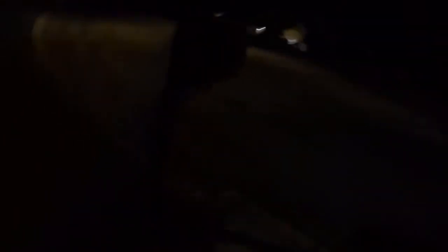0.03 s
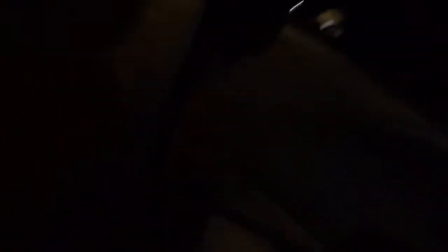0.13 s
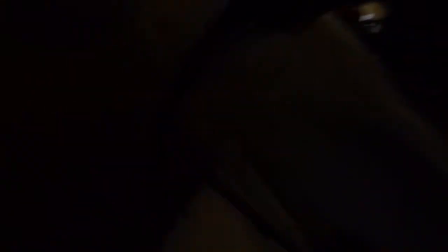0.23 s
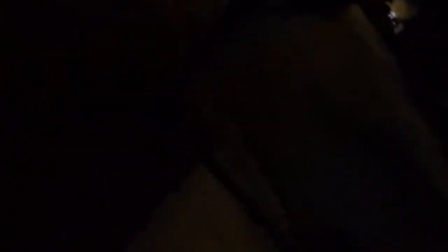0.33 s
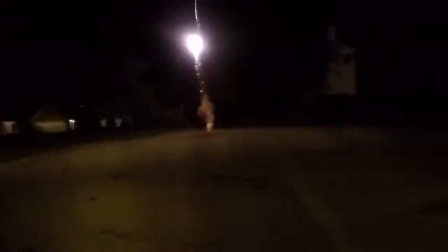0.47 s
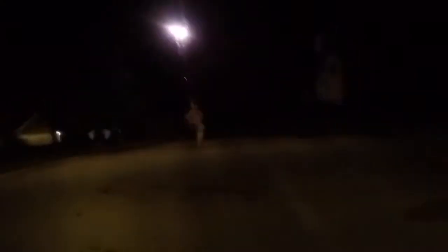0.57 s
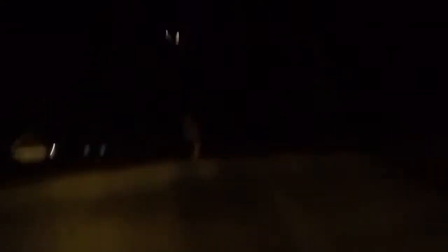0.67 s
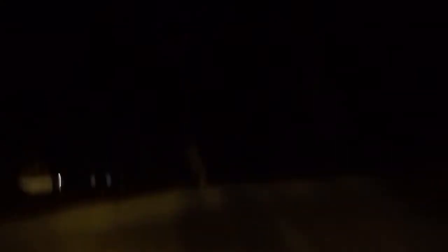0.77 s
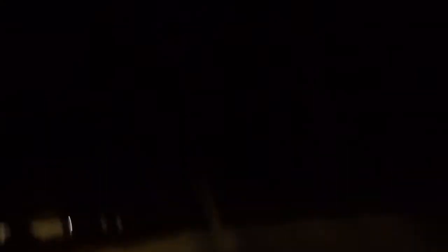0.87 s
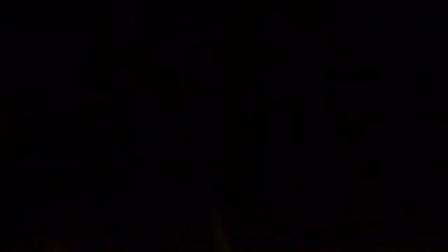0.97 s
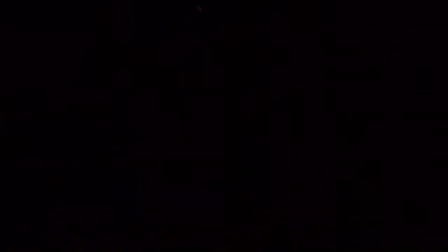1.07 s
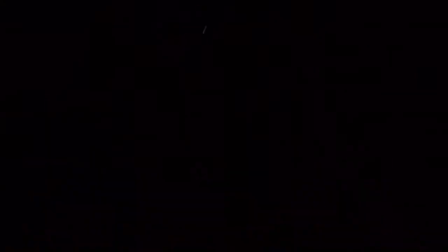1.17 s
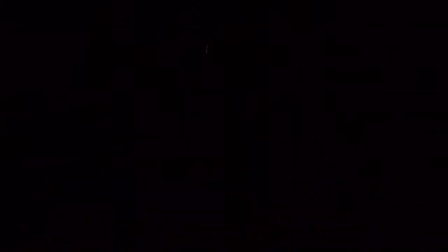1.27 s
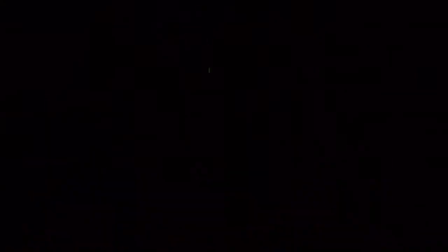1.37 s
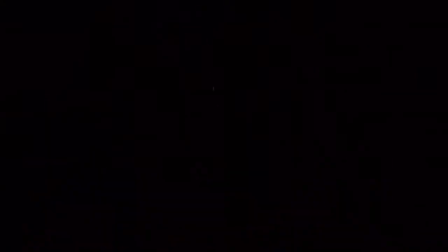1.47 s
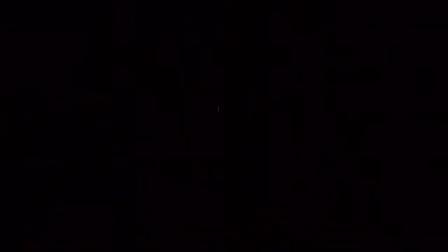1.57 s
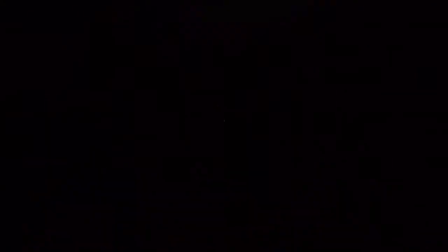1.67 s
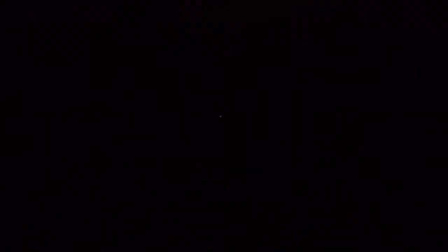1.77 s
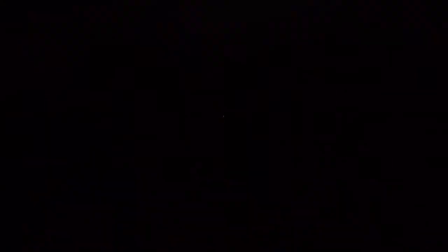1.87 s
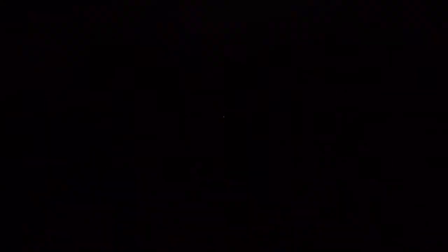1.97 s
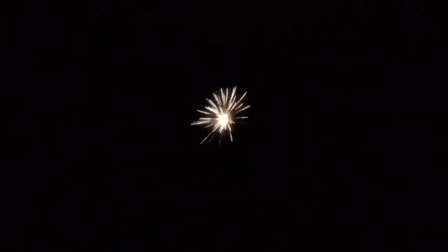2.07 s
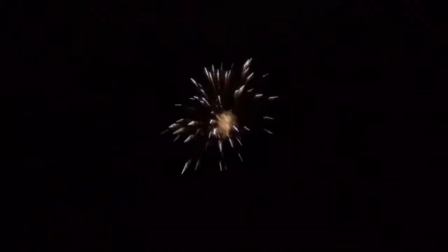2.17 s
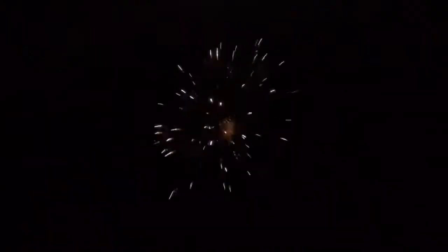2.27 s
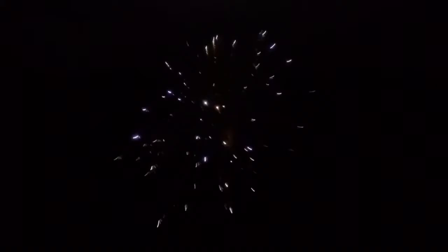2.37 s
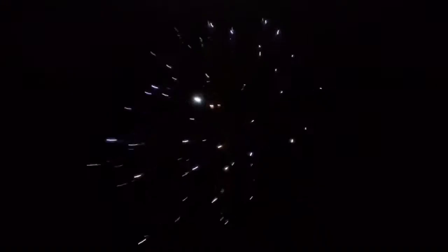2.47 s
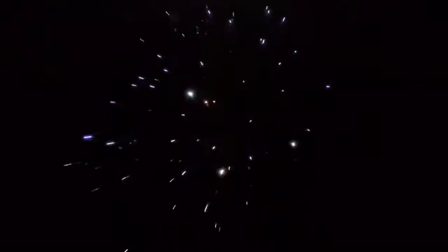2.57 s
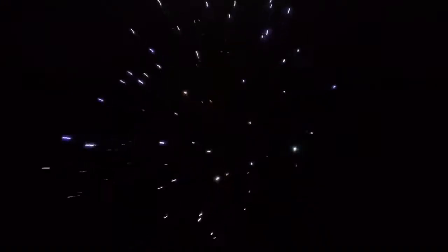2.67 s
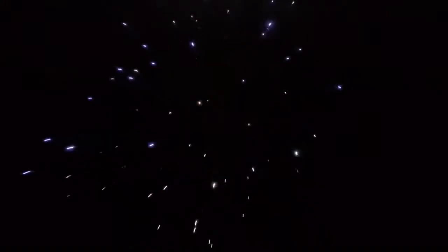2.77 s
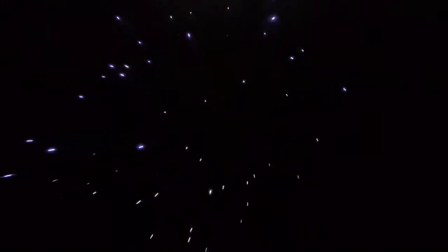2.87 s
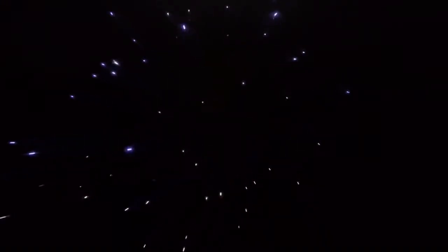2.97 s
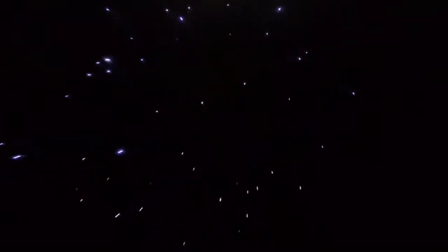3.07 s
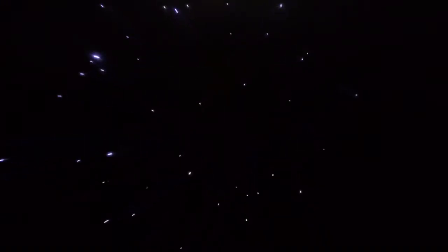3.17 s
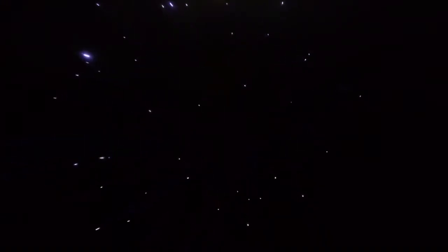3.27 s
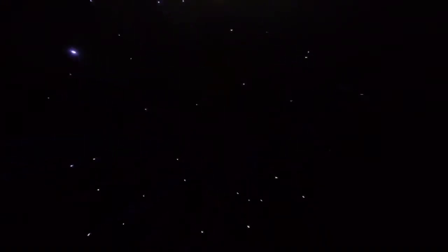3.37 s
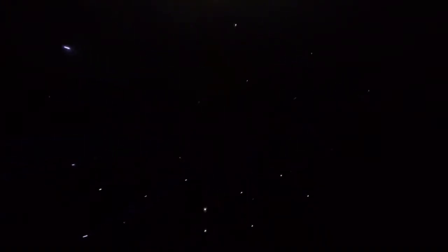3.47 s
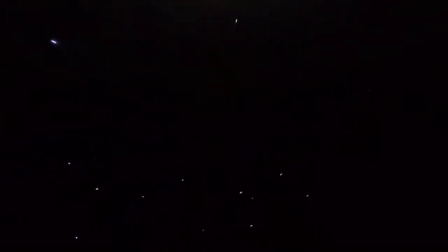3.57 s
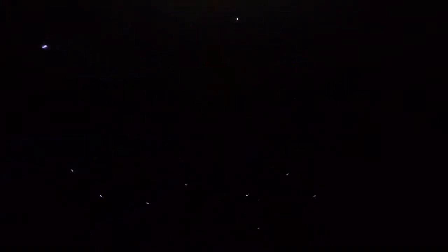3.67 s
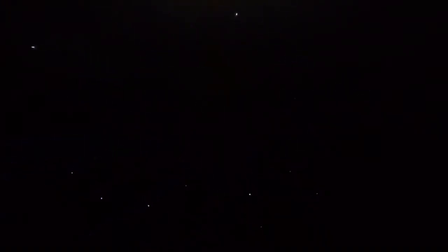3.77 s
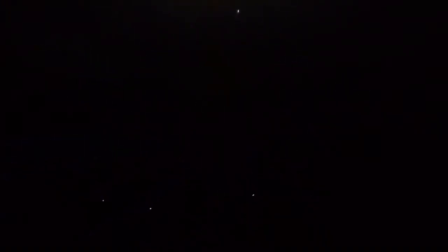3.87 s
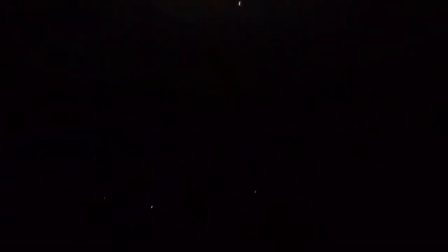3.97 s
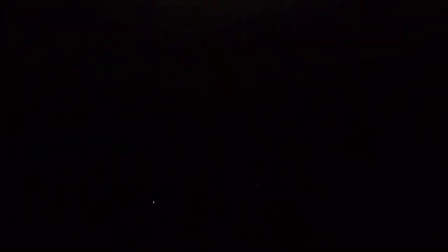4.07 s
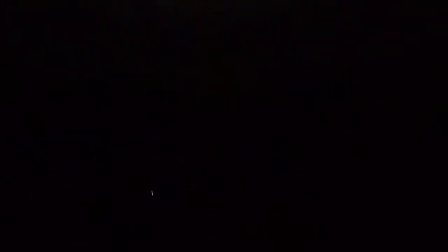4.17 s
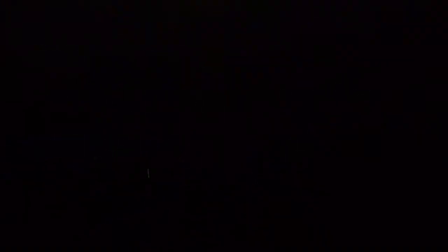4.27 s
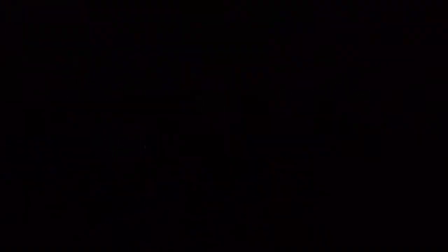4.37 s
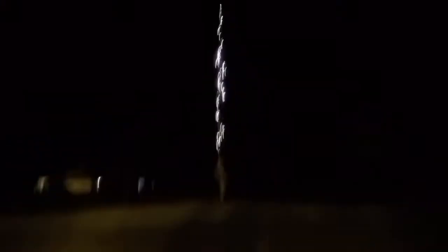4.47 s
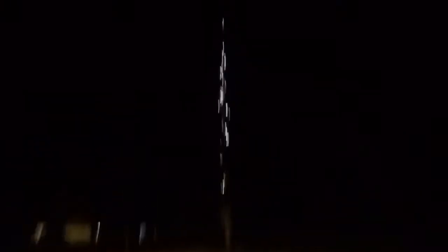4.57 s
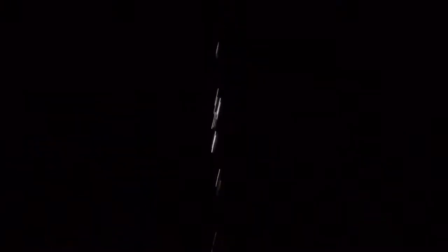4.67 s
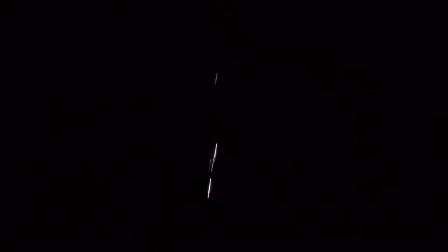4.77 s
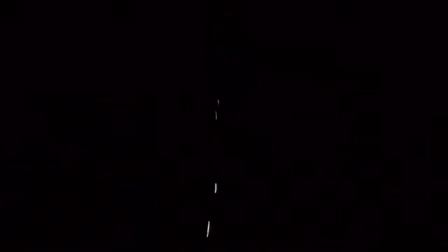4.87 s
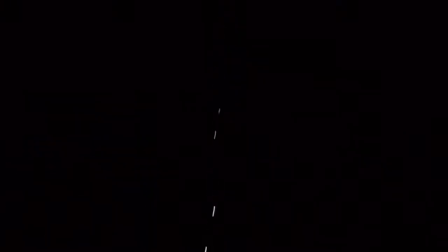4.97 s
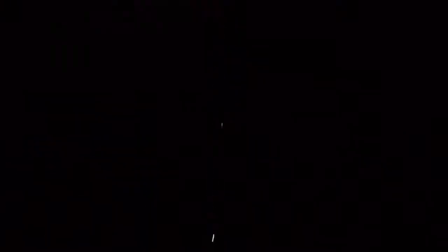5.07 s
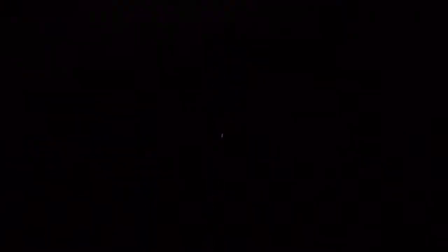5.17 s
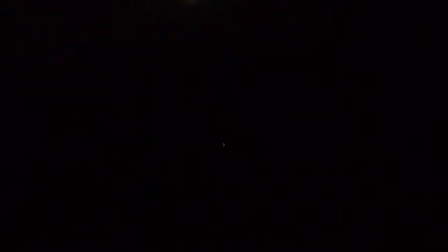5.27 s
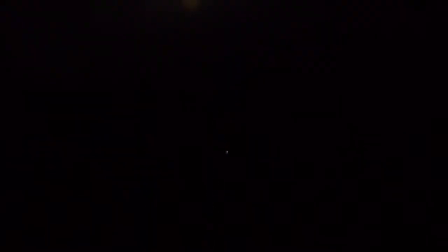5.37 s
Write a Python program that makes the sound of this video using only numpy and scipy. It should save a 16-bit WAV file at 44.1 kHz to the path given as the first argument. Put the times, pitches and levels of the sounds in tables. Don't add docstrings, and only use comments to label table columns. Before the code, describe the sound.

A breezy open road at night, heard through a hand-held stereo microphone. From 0 to 0.4 s, hard knocks, cloth rubs, small ticks and low wind buffeting cover high crickets and a cicada. The sound pinches nearly shut, then at about 0.47 s a firework launches with a dull thump, with a loud cracking return near 0.66 s and echoes rolling off by about 1 s. The insects, ducked by the gain control, creep back; a cicada swells around 1.7 s, throbbing about eleven times a second. At 2.22 s the burst hits: one sharp, clipped, crackling bang, with lumpy echoes to about 2.5 s and a low rumble lingering. Insects return, the cicada swelling again near 3.7 s. At 4.5 s another, softer launch report thuds with brief echoes. Wind and insects recover, a near cricket grows from 5.2 s, and a last thump lands at 5.4 s.

```python
import sys
import numpy as np
from scipy import signal
from scipy.fft import rfft, irfft, next_fast_len
from scipy.io import wavfile

SR = 44100
rng = np.random.default_rng(int(sys.argv[2]) if len(sys.argv) > 2 else 0)


def volts_from_db(level):
    exponent = np.asarray(level, float) / 20
    return 10 ** exponent


def pcm_store(signal):
    levels = np.round(np.clip(np.atleast_2d(signal), -1, 1) * 32767)
    wavfile.write(sys.argv[1], SR, levels.astype(np.int16).T)


N = 238889
TIME = np.arange(N) / SR

# frequency_hz, likeness (-1 to 1)
LIKENESS = [(60, 0.97), (130, 1), (290, 1), (640, 0.49), (1400, 0.073), (3100, 0.52), (6800, 0.074),
            (15000, 0.01)]

# start_s, drop_db, recovery_db_per_s
RECOVERY = [
    (0, 1, -42),
    (.467, -22, 12.5),
    (2.239, -25, 14),
    (4.504, -14.5, 20.5),
]
# closing_s, shut_s, reopening_s, open_s, depth_db
CLOSINGS = [
    (.4212, .4216, 0.46, .468, -66),
    (2.223, 2.243, 2.245, 2.5, -2.5),
    (4.468, 4.497, 4.503, 4.511, -17),
]
# start_s, end_s
MASKED_SPANS = [(1.28, 1.62), (1.77, 2.12), (3.6, 3.69), (4.0, 4.05), (4.19, 4.45), (4.94, 5.05)]
MASKED_LOW_HZ, MASKED_HIGH_HZ = 6700, 9000

# frequency_hz, level_db_per_hz
WIND_SPECTRUM = [(12, -13.5), (25, 1.5), (45, -4), (70, -18), (120, -33.5), (300, -47), (600, -79)]
# time_s, level_db
GUSTS = [(0, -17.5), (.3, -19), (.345, -30.5), (.395, -18.5), (.47, -48.5), (.7, -37), (.85, -44),
         (1.12, -39.5), (1.3, -38), (1.6, -27.5), (2.2, -28.5), (2.25, -44), (3.2, -46), (3.75, -33),
         (3.9, -38.5), (4.2, -32.5), (4.5, -29), (5.42, -27.5)]

# crest_s, rub_db, rumble_db, swish_db
HAND_STROKES = [
    (0, -30.5, -22, -42.5),
    (0.042, -36, -42, -33),
    (0.066, -22.5, -22.5, -40.5),
    (.085, -38, -31, -54),
    (.13, -46, -28, -46),
    (0.237, -50, -25, -59),
    (.285, -54, -26.5, -61),
    (.34, -51, -35, -62),
    (0.391, -56.5, -42, -67),
]
HAND_RISE_S, HAND_FALL_DB_PER_S = 0.029, [770, 580, 480]
# start_s, left_db, right_db, right_sign, end_hz
KNOCKS = [
    (.0012, -2.5, -4.5, -1, 400),
    (.0655, -3, -3, -1, 300),
    (.2282, -6, -11, -1, 70),
    (.2515, -20, -22, -1, 200),
    (.274, -17, -19, -1, 120),
    (.332, -36, -38, 1, 500),
    (.338, -36, -34, 1, 600),
    (.387, -33, -35, 1, 150),
]
KNOCK_DROP_HZ, KNOCK_DECAY_S = 550, .0065
# start_s, peak_db, pitch_hz, left_minus_right_db
TICKS = [
    (.1262, -20, 2450, 5),
    (.2117, -45, 1200, 6),
    (.0015, -20, 2400, 4),
    (3.3405, -44, 1920, -2),
    (5.272, -40, 1500, -3),
]

# frequency_hz, level_db_per_hz
CHORUS_SPECTRUM = [(5200, -16), (5700, 3.5), (6050, 7.5), (6400, -1), (6650, -20.5), (7500, -79.5),
                   (9000, -69)]
CHORUS_DB = -46
# first_stroke_s, last_stroke_s, first_db, last_db
CRICKET_TRAINS = [
    (0.096, .418, -38.5, -46.5),
    (5.218, 5.41, -35, -23.5),
]
WING_PERIOD_S, WING_SLIP_S, WING_SPREAD_DB = .018, .0015, 2.5

# pitch_hz, width_hz, level_db
CICADA_MODES = [(2010, 240, -5.5), (3100, 470, -1.5), (4170, 720, -1), (5140, 1000, 0)]
# full_s, level_db, rise_s_per_20_db, end_s
CICADA_SWELLS = [
    (.14, -45, -0.5, .43),
    (1.68, -42, 0.4, 2.22),
    (3.68, -44, 1, 4.47),
    (5.12, -46.5, 0.5, 5.51),
]
# crest_s, rate_hz, depth_db
CICADA_THROBS = [
    (.2, 11.5, 2),
    (1.735, 11.5, 9),
    (3.61, 10.9, 10),
    (5.215, 11.8, 7),
]
# frequency_hz, level_db_per_hz
OVERTONES = [(6400, -12.5), (6900, 12), (7800, -17), (8600, -11), (10000, -6), (12500, -8), (14800, -11.5)]

# frequency_hz, level_db_per_hz
CHEST_SPECTRUM = [(130, -34.5), (190, 1.5), (300, 0), (440, -3.5), (520, -14), (800, -50)]
DEEP_SPECTRUM = [(50, -14.5), (80, -0.5), (140, 2), (190, -3.5), (300, -22)]
MID_SPECTRUM = [(300, -29), (520, -1.5), (800, -3), (1200, -4.5), (1700, -9.5), (2600, -14.5), (5000, -24)]
BRIGHT_SPECTRUM = [(1200, 2.5), (2000, 0.5), (3500, -3), (5000, -1.5), (6200, -0.5), (7500, -9),
                   (9000, -22.5), (12500, -37), (15000, -44)]
# crest_s, level_db, rise_s_per_20_db, extra_brightness_db
LAUNCH_WAVES = [
    (.474, 1, -0.06, -2),
    (.5, 0.5, -0.18, 3),
    (.58, -4, 0.13, 6),
    (.66, 0, -0.06, 3.5),
    (4.513, 2, -0.29, -1),
    (4.545, -7.5, 0.1, 7.5),
    (4.6, -11.5, 0.7, 6.5),
]
BURST_WAVES = [
    (2.285, -1.5, 0.077, -2),
    (2.39, -7.5, 0.14, 5.5),
    (2.47, 0.5, 0.15, 0),
]
LAUNCH_DB, LAUNCH_FALL = [-36.5, -21.5, -40.5, -41.5], [38.5, 55.4, 34.5, 63.4]
BURST_DB, BURST_FALL = [-26, -27, -36.5, -41], [57, 65, 52.3, 53]
# (start_s, end_s), level_db, climb_db_per_s
LINGER_S, LINGER_DB, LINGER_CLIMB = (2.3, 4.5), [-39, -42, -46.5], [1.65, -0.75, -2.35]
# level_db, share of the gain control it follows
HUM_DB, HUM_FOLLOWS = [-46.5, -38.5, -55, -63.5], [0.82, 0.89, 0.16, .5]
# crest_s, peak_db, left_minus_right_db, decay_s, crack_db
DULL_THUMPS = [(.474, -13, 1, 0.026, -25), (.508, -8, -2, 0.019, -33), (.525, -6.5, -2, .024, -21),
               (0.682, -4.5, 1, 0.021, -11), (0.706, -13, -3, 0.0053, -6), (.733, -8, -1, .0068, -7.5),
               (1.879, -26, 0, 0.011, -17), (2.378, -10.5, -11, 0.007, -38), (2.426, -6.5, -3, 0.03, -15.5),
               (2.447, -15, 8, .008, -19), (4.513, -8, -2, 0.011, -23)]
SHARP_THUMPS = [
    (0.496, -21, -17, 0.014, -30),
    (.658, -3, -3, 0.036, -7),
    (4.561, -12.5, -3, .014, -45),
    (5.408, -12, -4.5, 0.014, -25.5),
]
DULL_HZ, SHARP_HZ, SETTLE_HZ = 630, 1303, 143.3

# from_shock_s, peak_db, top_hz, grit_db
SHOCKS = [
    (-.0423, -31.5, 1500, -1),
    (-.0316, -23.5, 1510, -4),
    (-.0209, -23, 1300, -2.5),
    (-.0099, -5, 1000, -12.5),
    (0, 1, 9500, -10.5),
    (0.0113, -10, 800, -17),
]
SHOCK_S = 2.22007


def rms_one(x):
    return x / np.sqrt(np.mean(x ** 2) + 1e-20)


def drift(rate):
    r = np.exp(-80 * np.pi * rate / SR)
    slow = signal.lfilter([1], [1, -2 * r, r * r], rng.standard_normal(N // 40 + 2002))[2000:]
    return np.interp(np.arange(N) / 40, np.arange(len(slow)), rms_one(slow))


def coloured(spectrum, likeness=LIKENESS):
    size = next_fast_len(N)
    log_hz = np.log(np.arange(size // 2 + 1) * SR / size + 1e-3)

    def read(table, **ends):
        hz, value = np.transpose(table)
        return np.interp(log_hz, np.log(hz), value, **ends)

    mid, side = rfft(rng.standard_normal((2, size))) * volts_from_db(read(spectrum, left=-120, right=-120))
    alike = np.clip(read(likeness), -.98, .98)
    pair = np.sqrt(1 + alike) * mid + np.sqrt(1 - alike) * side * [[1], [-1]]
    pair = irfft(pair, size)[:, :N]
    return pair / np.std(pair.mean(axis=0))


def resonate(x, hz, width_hz):
    r = np.exp(-np.pi * width_hz / SR)
    zeros = np.array([1, 0, -1]) * (1 - r * r) / 2
    return signal.lfilter(zeros, [1, -2 * r * np.cos(2 * np.pi * hz / SR), r * r], x)


def dulled(x, top_hz):
    return signal.sosfilt(signal.butter(4, top_hz, fs=SR, output="sos"), x)


def falling(t, start_hz, end_hz, glide):
    return 2 * np.pi * (end_hz * t + (start_hz - end_hz) * glide * (1 - np.exp(-t / glide)))


def whump(start_hz, end_hz, decay, rise=.001):
    t = np.arange(round(.06 * SR)) / SR
    envelope = (1 - np.exp(-t / rise)) * np.exp(-t / decay)
    return envelope * np.sin(falling(t, start_hz, end_hz, 0.00297))


def panned(db, pan_db):
    return volts_from_db([db + pan_db / 2, db - pan_db / 2])


def add(out, s, wave, gains):
    i = max(round(s * SR), 0)
    wave = wave[..., :N - i]
    out[:, i:i + wave.shape[-1]] += wave * np.reshape(gains, (2, 1))


def swell(s, db, rise, fall):
    db, fall = np.reshape(db, (-1, 1)), np.reshape(fall, (-1, 1))
    climb_db = 20 * np.maximum(s - TIME, 0) / max(rise, 1e-3)
    return volts_from_db(db - climb_db - fall * np.maximum(TIME - s, 0))


def recovery_db():
    s, drop_db, rate = np.transpose(RECOVERY)
    last = np.maximum(np.searchsorted(s, TIME, side="right") - 1, 0)
    return np.minimum(drop_db[last] + rate[last] * (TIME - s[last]), 0)


def wind():
    gusts = coloured(WIND_SPECTRUM, likeness=[(20, -0.852), (70, -0.567), (200, -0.39)])
    lean_db = np.interp(TIME, [.4, .9], [0.3, 2.8])
    strength_db = np.interp(TIME, *np.transpose(GUSTS)) + 2.0 * drift(4.6)
    return volts_from_db(strength_db) * gusts * volts_from_db(lean_db * [[-1], [1]])


def handling():
    rub, rumble, swish = sum(swell(s, db, HAND_RISE_S, HAND_FALL_DB_PER_S) for s, *db in HAND_STROKES)
    apart = [(100, -0.33), (1000, -0.91)]
    thud = [(60, 10), (100, -13.0), (300, -8.0), (500, -22.5), (900, -42)]
    housing = [(300, 9.5), (550, 4.0), (1300, 7), (1900, -15.5), (2400, -14), (3000, -37), (5000, -52.0)]
    out = rumble * volts_from_db(0.5) * coloured(thud, apart)
    out += rub * volts_from_db(-3.0 + 2.0 * drift(89)) * coloured(housing, apart)
    out += swish * volts_from_db(3.0) * coloured(BRIGHT_SPECTRUM)
    for s, left_db, right_db, sign, end_hz in KNOCKS:
        knock = whump(end_hz + KNOCK_DROP_HZ, end_hz, KNOCK_DECAY_S, rise=.0004)
        add(out, s, knock, volts_from_db([left_db, right_db]) * [1, np.sign(sign)])
    t = np.arange(round(0.017 * SR)) / SR
    decay = np.exp(-t / .0009)
    for (s, db, hz, pan_db), grit in zip(TICKS, rng.standard_normal((len(TICKS), len(t)))):
        tick = np.sin(2 * np.pi * hz * t) * decay + 3 * dulled(grit * decay, 4600)
        add(out, s, tick, panned(db, pan_db))
    return out


def chorus():
    flutter_db = 0.35 * drift(28) + 0.64 * drift(32) + 2.77 * drift(4.8)
    return volts_from_db(CHORUS_DB + recovery_db() + flutter_db) * coloured(CHORUS_SPECTRUM)


def cricket():
    out, t = np.zeros((2, N)), np.arange(round(0.015 * SR)) / SR
    chirps = []
    for first, last, *ends_db in CRICKET_TRAINS:
        for s in np.arange(first, last, WING_PERIOD_S):
            chirps.append((s, np.interp(s, [first, last], ends_db)))
    for (s, db), (pitch, phase, size, slip) in zip(chirps, rng.random((40, 4))):
        s += WING_SLIP_S * (2 * slip - 1)
        db += WING_SPREAD_DB * (2 * size - 1)
        port_phase = np.array([[0], [1.4]])
        turn = falling(t, 5650 + 200 * pitch, 4440, 0.011) + 2 * np.pi * phase + port_phase
        add(out, s - .002, np.sin(turn) * np.hanning(len(t)), panned(db - 5.0, 0.14))
    return out


def cicada():
    rattle_spectrum = [(1200, -26), (1900, -2), (5600, 2.5), (6500, -8.5), (6900, -38)]
    rattle = coloured(rattle_spectrum, likeness=[(2000, 0.39), (5000, 0.51), (12000, 0.031)])
    rings = [volts_from_db(db + 0.87 * drift(7.9)) / np.sqrt(width) * resonate(rattle, hz, width)
             for hz, width, db in CICADA_MODES]
    body = sum(rings[::2]) - sum(rings[1::2])
    gain = level = 0
    for (s, db, rise, end), (crest, rate, depth_db) in zip(CICADA_SWELLS, CICADA_THROBS):
        onset = np.clip((TIME - s + 0.29) / .06, 0, 1)
        own = swell(s, db, rise, 2.7) * onset
        own = own * volts_from_db(recovery_db() - 200.0 * np.maximum(TIME - end, 0))
        level = level + own
        dip = (.5 - .5 * np.cos(2 * np.pi * rate * (TIME - crest))) ** 3
        filling = .3 + .7 * np.exp(-(np.maximum(TIME - s + .3, 0) / .45) ** 2)
        gain = gain + own * volts_from_db(-depth_db * filling * dip)
    top = level * volts_from_db(-20.0 + 1.1 * drift(6.1)) * coloured(OVERTONES)
    return gain * volts_from_db(2.0) * rms_one(body) + top


def echo_levels():
    power = 0
    launch, burst_echo = (LAUNCH_WAVES, LAUNCH_DB, LAUNCH_FALL), (BURST_WAVES, BURST_DB, BURST_FALL)
    for waves, layer_db, fall in [launch, burst_echo]:
        for s, db, rise, bright_db in waves:
            wave_db = np.add(layer_db, db) + bright_db * np.array([0, 0, 1, 1])
            power = power + swell(s, wave_db, rise, fall) ** 2
    start, end = LINGER_S
    linger = swell(start, LINGER_DB, 0.055, np.negative(LINGER_CLIMB)) * (TIME < end)
    hum = volts_from_db(np.reshape(HUM_DB, (-1, 1)) + np.outer(HUM_FOLLOWS, recovery_db()))
    power[:len(linger)] += linger ** 2
    return np.sqrt(power + hum ** 2)


def rolling_echoes():
    chest, deep, mid, bright = echo_levels()
    lumps = drift(10.0)
    low = deep * volts_from_db(1.6 * lumps + 2.53 * drift(23.6)) * coloured(DEEP_SPECTRUM)
    low += chest * volts_from_db(0.5 * lumps + 1.63 * drift(54)) * coloured(CHEST_SPECTRUM)
    grain = .9 * lumps + 1.2 * drift(120)
    high = mid * volts_from_db(grain) * coloured(MID_SPECTRUM)
    high += bright * volts_from_db(5.0 + grain) * coloured(BRIGHT_SPECTRUM)
    out = (low + high) * volts_from_db([[-.6], [.6]])
    t = np.arange(round(0.0074 * SR)) / SR
    thumps = [(*row, DULL_HZ) for row in DULL_THUMPS] + [(*row, SHARP_HZ) for row in SHARP_THUMPS]
    grits = rng.standard_normal((len(thumps), 2, len(t)))
    for (s, db, pan_db, decay, crack_db, start_hz), grit in zip(thumps, grits):
        add(out, s - .001, whump(start_hz, SETTLE_HZ, decay), panned(db - 10.0, pan_db))
        shared_grit = grit + 0.46 * grit[::-1]
        crack = dulled(shared_grit * np.exp(-t / 0.0055), 2860)
        add(out, s - .001, crack, panned(db + crack_db, pan_db))
    return out


def burst():
    out, lead = np.zeros((2, N)), .03
    t = np.arange(round(.06 * SR)) / SR - lead
    before, after = np.maximum(-t, 0), np.maximum(t, 0)
    climb = np.cos(2 * np.pi * 450 * before) * np.exp(-(before / .001) ** 2)
    snap = -np.cos(falling(after, 305, 110, .006)) * np.exp(-after / .0033)
    pre_ring = .014 * np.sin(2 * np.pi * 7950 * t) * np.exp(-before / .008)
    front = np.where(t < 0, climb + pre_ring, snap)
    ragged = (t > -.0008) * (np.exp(-(after / .0021) ** 4) + .17 * np.exp(-(after / .009) ** 2))
    grits = rng.standard_normal((len(SHOCKS), 2, len(t)))
    for (s, db, top_hz, grit_db), grit in zip(SHOCKS, grits):
        dull = signal.sosfiltfilt(signal.butter(2, top_hz, fs=SR, output="sos"), front)
        crackle = dulled(grit * ragged, 4920)
        add(out, SHOCK_S + s - lead, dull + volts_from_db(grit_db) * crackle, panned(db, -0.5))
    return out


def scene():
    around = wind() + handling() + chorus() + cricket() + cicada() + rolling_echoes()
    closed_db = sum(np.interp(TIME, np.sort(times), [0, db, db, 0]) for *times, db in CLOSINGS)
    return around * volts_from_db(closed_db) + burst()


def masked(x):
    size = next_fast_len(N)
    hz = np.arange(size // 2 + 1) * SR / size
    inside = (hz > MASKED_LOW_HZ) & (hz < MASKED_HIGH_HZ)
    band = irfft(rfft(x, size) * inside, size)[:, :N]
    gate = sum(np.clip(np.minimum(TIME - start, end - TIME) / .01, 0, 1) for start, end in MASKED_SPANS)
    return x - band * gate


def roll_off(x):
    return signal.sosfilt(signal.butter(12, 15200, fs=SR, output="sos"), x)


def record(dry):
    mix = masked(np.clip(dry, -1, 1))
    return roll_off(mix)


dry = scene()
out = record(dry)
pcm_store(out)
```